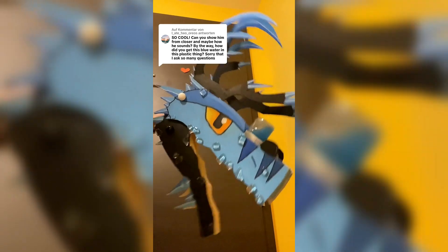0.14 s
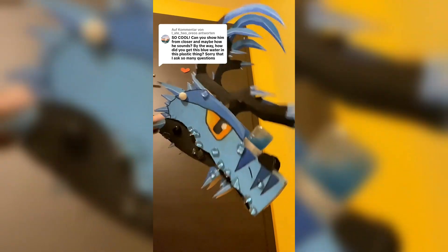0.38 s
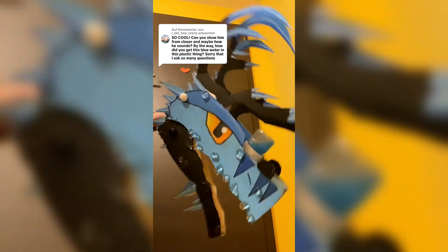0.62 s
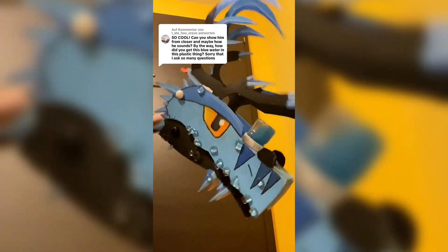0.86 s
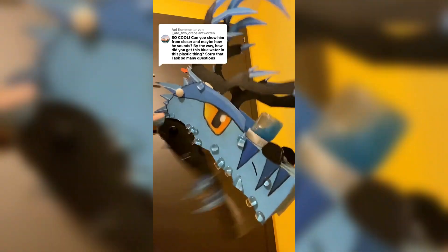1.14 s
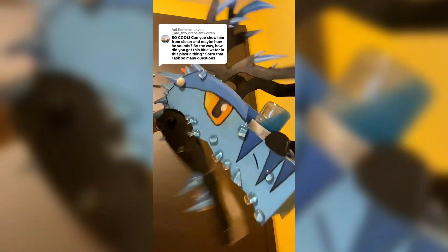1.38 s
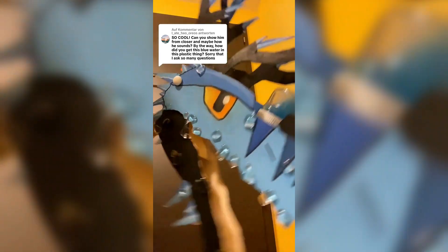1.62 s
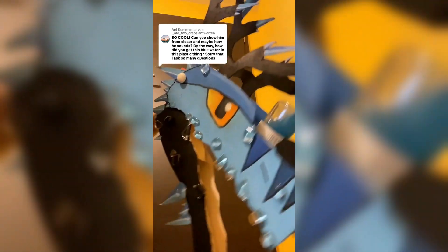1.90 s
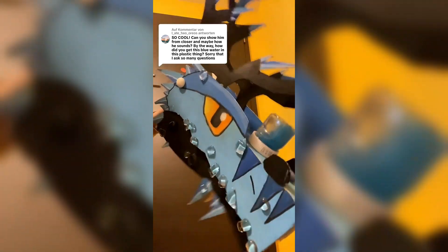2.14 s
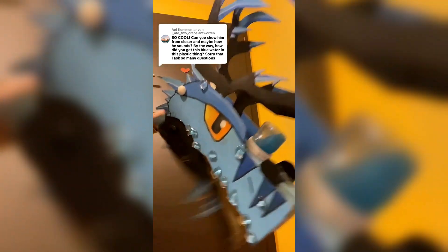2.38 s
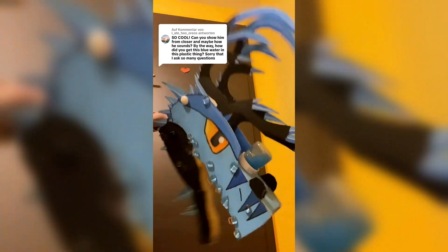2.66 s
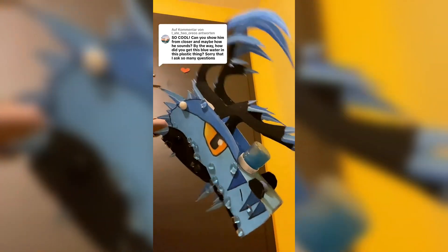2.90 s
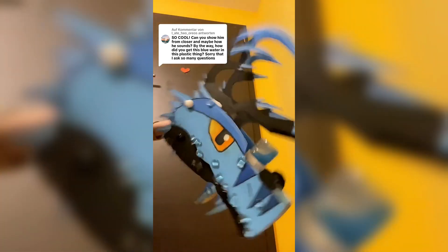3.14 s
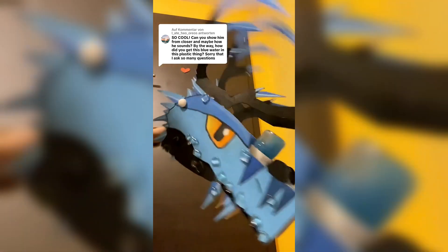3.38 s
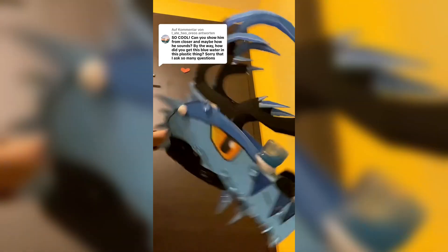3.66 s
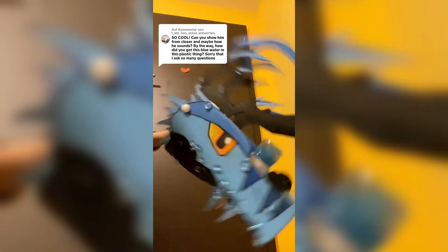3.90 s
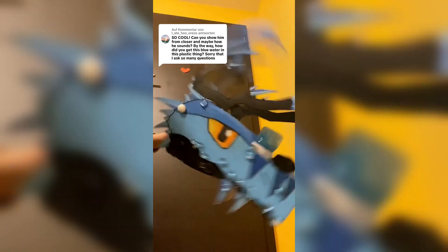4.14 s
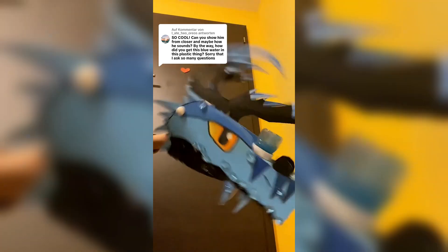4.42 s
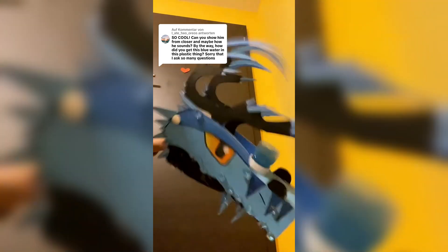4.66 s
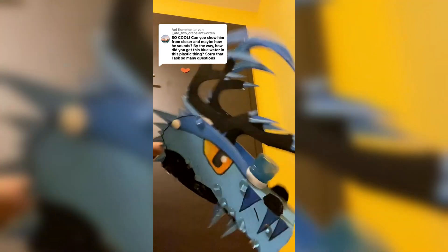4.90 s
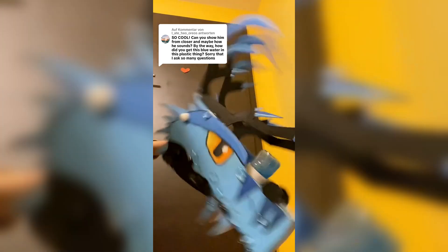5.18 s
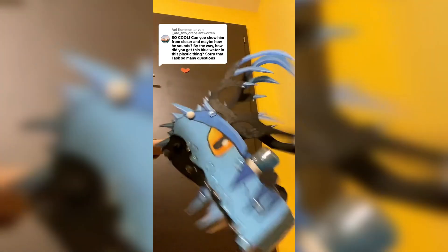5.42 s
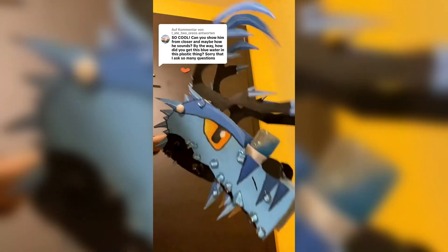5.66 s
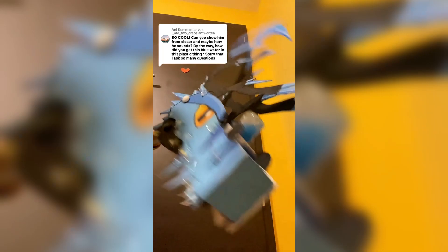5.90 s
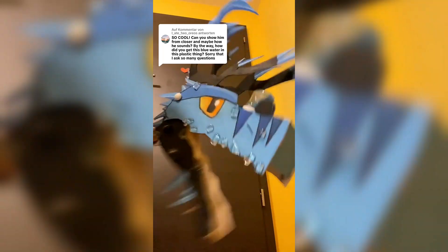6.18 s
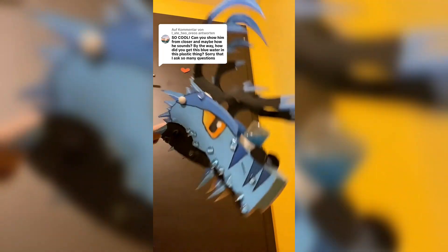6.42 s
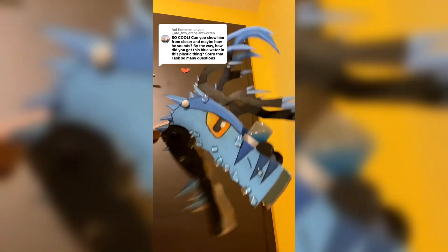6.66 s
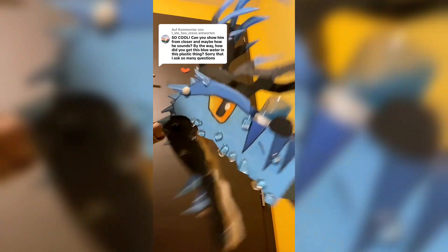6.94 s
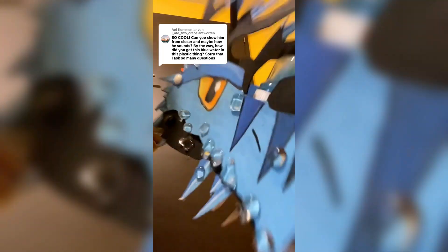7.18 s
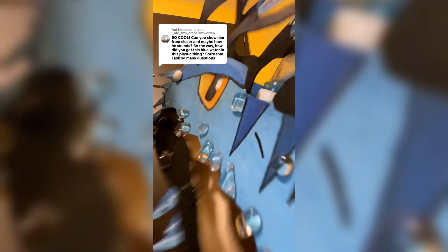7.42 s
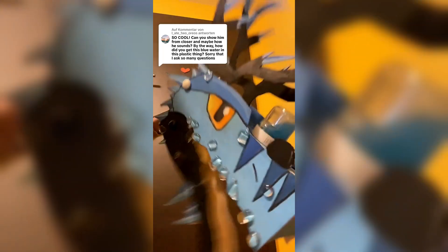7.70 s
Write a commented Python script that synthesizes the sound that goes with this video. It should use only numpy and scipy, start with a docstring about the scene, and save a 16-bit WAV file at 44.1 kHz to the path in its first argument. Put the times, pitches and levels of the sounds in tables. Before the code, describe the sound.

Sharp papery clacks and crisp crease ticks, sparse at first then crowded, ending in hard, slightly overloaded snaps in a small quiet room.

```python
"""A folded paper puppet snaps its jaws close to a phone in a small room.
Blows excite the damped modes of the hollow card jaws, creases snap in sprays of tiny slips, and
the head booms as a fading sine. Sheets rub with gritty noise that also drives the jaw modes.
Low noise swells as the flapping head puffs air at the microphone, over a faint room tone;
the loudest snaps overload it."""
import sys
import numpy as np
from scipy import signal
from scipy.fft import rfft, irfft, next_fast_len
from scipy.io import wavfile
from scipy.ndimage import uniform_filter1d

SR = 44100
rng = np.random.default_rng(int(sys.argv[2]) if len(sys.argv) > 2 else 0)


def decibels_to_gain(level_db):
    """Convert a level in decibels to a linear amplitude gain (20 dB per decade)."""
    exponent = np.asarray(level_db, float) / 20
    return 10 ** exponent


def generate_wav(sig):
    """Save sig (samples, or channels by samples) to the path in sys.argv[1] as 16-bit PCM at SR."""
    pcm = np.round(np.clip(np.atleast_2d(sig).T, -1, 1) * 32767).astype(np.int16)
    wavfile.write(sys.argv[1], SR, pcm)


N = 344421  # samples

# Modes of the hollow jaws, which blows and rubbing each weight and damp in their own way.
# Each row: frequency in Hz, nominal level in dB, nominal 60 dB decay time in seconds.
JAW_MODES = [(310, -13, .03), (405, -9, .035), (560, -10, .02), (750, -1, .024), (880, -4, .016),
             (1020, -1, .02), (1240, -1, .022), (1450, -5, .014), (1690, -7, .012), (2150, -10, .009),
             (2600, -11, .01), (3250, -19, .007)]


def colour(x, points):
    """Linear filtering: weights the spectrum by (Hz, dB) points joined along log frequency."""
    hz, db = np.transpose(points)
    size = next_fast_len(len(x))
    f = np.arange(size // 2 + 1) * SR / size + 1  # 1 Hz up, to keep the logarithm finite
    gain = decibels_to_gain(np.interp(np.log(f), np.log(hz), db))
    return irfft(rfft(x, size) * gain, size)[:len(x)]


def unit(x):
    """Normalises the mean power: scales to rms 1."""
    return x / np.sqrt(np.mean(x ** 2))


def loudest_rms(x):
    """Short-time power: the highest rms over any 3 ms."""
    return np.sqrt(uniform_filter1d(x ** 2, size=132).max())


def fade(t, t60):
    """Linear damping: exponential decay, 60 dB in t60 seconds."""
    return np.exp(-np.log(1000) * t / t60)


def add(track, s, sound):
    """Superposition: mixes a short sound into the track at time s in seconds."""
    i = int(s * SR)
    track[i:i + len(sound)] += sound[:len(track) - i]


def grit(shape, scatter_db):
    """Stick-slip noise: samples that differ widely in size, as a stream of tiny slips."""
    size_db = scatter_db * np.minimum(rng.exponential(size=shape), 6.0)
    return rng.standard_normal(shape) * decibels_to_gain(size_db)


def walk(rate):
    """Slow random modulation: a new level every 1 / rate seconds, joined by straight slopes."""
    k = int(SR / rate)
    held = np.repeat(rng.standard_normal(N // k + 1), k)
    return uniform_filter1d(held, k)[:N]


def ring(t, hz, db, t60, phase):
    """Modal superposition: the sum of exponentially fading sines."""
    waves = np.sin(2 * np.pi * hz[:, None] * t + phase[:, None])
    return (decibels_to_gain(db)[:, None] * fade(t, t60[:, None]) * waves).sum(axis=0)


def swells(full, held, db, rise_db_s, fall_db_s, rest_db):
    """Power sum of gestures that rise until the time full, hold and fall away over a resting level."""
    t = np.arange(0, N, 64)[:, None] / SR
    before = np.maximum(full - t, 0)
    after = np.maximum(t - full - held, 0)
    shape_db = db - rise_db_s * before - fall_db_s * after
    gain = np.sqrt(decibels_to_gain(rest_db) ** 2 + (decibels_to_gain(shape_db) ** 2).sum(axis=1))
    return np.interp(np.arange(N) / SR, t[:, 0], gain)


def knocks():
    """Impact excitation: a short press of many contacts rings the jaw modes, then loose card rattles."""
    # Jaws and flaps meeting. Each row: start in seconds, level in dB (2.5 above the loudest 3 ms rms),
    # pitch the ring gathers around in Hz, lift of the modes under 650 Hz in dB,
    # rattle in dB (before a common lift and random lumps).
    blow_rows = [(0.083, -42.5, 970, -2, -13), (0.14, -40.5, 1020, -8, -17), (0.215, -41, 1060, -4, -20),
                 (0.252, -34, 1120, 2, -5), (0.264, -27.5, 1690, -6, -18), (0.288, -2.5, 905, 3, -19),
                 (0.513, -37.5, 1050, -12, -27), (0.604, -25, 1120, -7, -25), (0.685, -41, 1050, 9, -15),
                 (0.726, -22.5, 1040, -1, -15), (0.771, -14, 960, 6.5, -15), (0.891, -35.5, 1190, -4, -9),
                 (0.937, -34, 1470, -6, -9), (0.992, -24, 1160, -16, -28), (1.166, -8.5, 845, 10.5, -12.5),
                 (1.239, -25.5, 1020, 2, -17), (1.343, -35, 1140, 1, -17), (1.46, -38, 490, 3, -8),
                 (1.514, -35, 1230, 0, -24), (1.711, -43, 1010, -6, -13.5), (1.9, -33, 1230, -2.5, -20),
                 (1.997, -39, 1250, -13, -20), (2.018, -19.5, 1560, -8, -15),
                 (2.045, -16.5, 965, -22, -13.5), (2.131, -43, 1070, -4, -17), (2.193, -35, 1030, -1, -30),
                 (2.215, -26.5, 1030, -10, -22.5), (2.37, -38, 1050, -4, -24), (2.397, -24, 860, -5, -21),
                 (2.457, -30, 1390, -13, -22), (2.479, -35.5, 870, 6, -10), (2.598, -29, 1280, -9, -21),
                 (2.609, -22.5, 1050, -10, -20), (2.718, -35, 1270, 3, -24), (2.742, -28, 1240, 5, -20),
                 (2.758, -14.5, 566, 3, -14.5), (2.783, -21, 410, 10, -17), (2.901, -17, 490, -4, -31),
                 (2.984, -31.5, 790, 0, -14), (3.133, -31, 1700, -12, -15), (3.158, -24, 1260, -4, -11),
                 (3.195, -21.5, 960, -4, -20), (3.234, -17, 1200, -8, -11), (3.253, -5.5, 1180, 3, -14),
                 (3.486, -25, 850, 4, -8), (3.584, -33, 870, -2, -17), (3.647, -28, 960, 3, 4),
                 (3.73, -29, 1270, 0, -8), (3.848, -30, 1040, 3, -13), (3.857, -31.5, 410, 7, -14),
                 (3.896, -42, 430, 11, -17), (3.923, -34, 1480, -3, -17), (3.973, -28.5, 1240, 4, -8),
                 (3.993, -25, 930, -2, -17), (4.03, -33, 960, 5, -14), (4.096, -18.5, 795, -10, -3),
                 (4.162, -28, 930, -6, -17), (4.2, -20, 860, 6, -15), (4.307, -31, 786, 1, -17),
                 (4.337, -23.5, 826, 6, -11), (4.358, -22.5, 1030, 1, -8), (4.508, -22, 810, 9.5, -8),
                 (4.544, -31, 700, -8, -26), (4.697, -18, 860, 3, -19), (4.725, -23, 930, 5, -8),
                 (4.89, -27.5, 450, -7, -19), (4.928, -22.5, 526, -6, -16.5), (5.123, -18.5, 1010, 2, -29),
                 (5.187, -21, 746, 6, -17), (5.356, -42, 490, -7, 0), (5.472, -31.5, 400, -6, -12),
                 (5.492, -19, 590, 6.5, -11), (5.535, -36, 1140, 8, -15), (5.592, -39, 467, 1, -14),
                 (5.618, -34, 950, -1, -17), (5.635, -33.5, 820, 8, -17), (5.689, -34, 830, -6, -17),
                 (5.744, -34, 980, -1, -9), (5.825, -32.5, 1220, -10, -26), (5.946, -34.5, 1000, -5, -15),
                 (5.977, -28, 396, 3, -10), (6.255, -20, 1020, -5, -11), (6.264, -1, 970, -22, -17),
                 (6.384, -36, 720, -7, -21), (6.407, -30.5, 960, -3, -12), (6.488, -41, 1020, -15, -19),
                 (6.536, -30, 1380, -9, -18.5), (6.672, -30.5, 1160, 2, -21),
                 (6.708, -1.5, 1260, -18, -20.5), (6.824, -32, 1700, -11, -27), (6.908, -42, 1000, -7, -31),
                 (6.978, -37.5, 1090, 3, -15), (7.055, -31, 400, 9, -12), (7.079, -15, 1110, 16, -28),
                 (7.11, -2, 1220, 4.5, -19), (7.197, -28.5, 750, -2, -20), (7.31, -38.5, 1170, -4, -17),
                 (7.367, -34, 550, 5, -25), (7.479, -1, 760, -1, -18), (7.597, -30.5, 740, 1, -12)]
    contact_ms, contact_law = 6.4, 0.33  # at 1 kHz; a lower patch is softer and is pressed longer
    out, t = np.zeros(N), np.arange(6000) / SR
    ring_t = t[:2000]
    hz, db, t60 = np.transpose(JAW_MODES)
    count = len(blow_rows)
    chance, slips = rng.standard_normal((count, 3, len(hz))), grit((count, len(t)), 2.3)
    lumps = np.repeat(rng.standard_normal((count, 15)), 400, axis=1)
    lumps = uniform_filter1d(lumps, size=200, axis=1)
    thin = signal.butter(2, 220, "high", fs=SR, output="sos")  # thin card radiates no bass
    for (s, level_db, pitch, low_db, rattle_db), c, slip, lump in zip(blow_rows, chance, slips, lumps):
        # a light tap wakes only the patch it lands on, a hard blow the whole jaw
        db_per_octave = -6.0 + 0.64 * level_db
        near_db = db_per_octave * np.abs(np.log2(hz / pitch)) + low_db * (hz < 650)
        # the jaws bend as they are worked, so the modes shift from blow to blow
        body = ring(ring_t, hz * (1 + .03 * c[0]), db + near_db + 1.5 * c[1], t60, 2 * c[2])
        # loose card is damped far more than the struck jaw
        loose = ring(ring_t, hz * (1 + .04 * c[1]), db + .4 * near_db, .3 * t60, .6 * c[2])
        ms = contact_ms * (1000 / pitch) ** contact_law
        press = np.exp(-(t * 1000 / ms) ** 3)
        closing = 1 - np.exp(-t / 0.00056)
        rattle_gain = decibels_to_gain(rattle_db + 6.0 + 3.6 * lump)
        rattle = slip * rattle_gain * fade(t, 0.12) * (1 - t / t[-1])
        struck = signal.fftconvolve(body, slip * closing * press)
        rattling = signal.fftconvolve(loose, rattle)
        blow = signal.sosfilt(thin, struck + rattling)
        add(out, s, decibels_to_gain(level_db - 2.5) * blow / loudest_rms(blow))
    return out


def ticks():
    """Stick-slip release: a crease creeps, snaps in a spray of slips and stops; the sheet rustles on."""
    # Edges and creases snapping. Each row: time of the snap in seconds (it follows within 1 ms, after a creep),
    # level in dB (10 above the loudest 3 ms rms), brightness in dB (nominal tilt from 3 kHz to
    # about 12 kHz), rustle in dB (before random lumps).
    snap_rows = [(0.038, -34, 0, -23), (0.0811, -22, 0, -18), (0.141, -29, -15, -15),
                 (0.1988, -28.5, -34, -18), (0.2379, -35, -2, -13), (0.2648, -11.5, -2, -5),
                 (0.2839, -8, -5, 6), (0.3974, -27, 9, -11), (0.689, -34, -5, 2), (0.7072, -14, -7.5, -7),
                 (0.741, -20, 0, -2), (0.7556, -9.5, -3.5, -11.5), (0.781, -15.5, 4, -3),
                 (0.8248, -13.5, -10, -17), (0.9344, -27.5, -1, -1), (1.1133, -18.5, -12, -13),
                 (1.1297, -22, 1, -15), (1.145, -17.5, -5, -17), (1.168, -6, -9, -2.5),
                 (1.2385, -15.5, -8, -26), (1.289, -21, 5, -22), (1.3194, -27, 2, -9),
                 (1.5278, -12, -6, -14), (1.557, -15.5, 15, -11), (1.599, -29, 6, -3),
                 (1.628, -31, -11, -11), (1.713, -20, -15, -15), (1.7704, -31.5, -20, -9),
                 (1.953, -39, -1, -13), (1.9741, -24.5, -5, -19), (2.0102, -3.5, 4, -7),
                 (2.0956, -33, -15, -6), (2.1302, -14, -6, -19), (2.19, -26, -4, 1), (2.2136, -24, -21, 2),
                 (2.352, -28, 2, -13), (2.3904, -16, -3, 12), (2.424, -14.5, -5, -11),
                 (2.4588, -20, -9, -20), (2.5521, -22, 7, -16), (2.591, -14.5, -4, -13),
                 (2.609, -17.5, -19, 3), (2.7376, -20, -10, -20), (2.7686, -3, 3, -12),
                 (2.9037, -8.5, -6.5, -15), (2.9841, -18.5, 1, -14), (3.1187, -34, -14, -2),
                 (3.134, -3.5, 8, -15), (3.1577, -13, -10, -4), (3.1752, -9, -2, -1), (3.2281, -5, -16, 7),
                 (3.2519, 0.5, -9, -16), (3.298, -8, 5, -2), (3.484, -11, -17.5, -14),
                 (3.5742, -10.5, 5.5, -18), (3.6546, -33.5, -4, -7), (3.6795, -30, 7, -11),
                 (3.7248, -25, 0, -2), (3.74, -19, -1, -4), (3.826, -22.5, -13, -3), (3.8593, -13, 1.5, -8),
                 (3.922, -24, -4, -5), (3.9731, -25, -8, -7), (3.9908, -16, -6, -7), (4.0233, -23, -3, -15),
                 (4.054, -28.5, 3, -5), (4.1035, -8.5, -17.5, -24), (4.16, -20, -22, -14),
                 (4.1972, -20, -15, -13), (4.211, -16.5, -10, -31), (4.311, -18, 2, -13),
                 (4.351, -14, 0, -8), (4.3553, -11.5, -6, -11), (4.5038, -10, -14.5, -3),
                 (4.5498, -14.5, 0.5, 14), (4.6406, -28.5, -8, -16), (4.695, -10, -7, -14),
                 (4.7262, -13.5, -4.5, -5), (4.7705, -24.5, 0, -11), (4.89, -16, -1.5, -13),
                 (4.9271, -21, -18, -9), (4.9434, -15.5, -4, 10.5), (5.0325, -25.5, -11, -21),
                 (5.1222, -18, -5, -3), (5.1857, -22, -12, -1), (5.2054, -17, -2, 3),
                 (5.387, -26.5, 4.5, 10), (5.4834, -23, 3, -9), (5.4862, -14, -9.5, -10),
                 (5.591, -25, -5, -8), (5.6194, -16.5, 11, 4), (5.69, -12, -1, -9), (5.7275, -14, 10, 5),
                 (5.7652, -11.5, -1, -3), (5.81, -21, 8, -3), (5.826, -6, 18.5, -11), (5.9728, -15.5, 8, 4),
                 (6.169, -30.5, -1, -12.5), (6.226, -32, -7, -11), (6.26, -6.5, 4, -20),
                 (6.321, -6.5, 10, -19), (6.3843, -12, 6, 5), (6.436, -17.5, 13, -16), (6.633, -33, 18, -4),
                 (6.6517, -23.5, -6, -16), (6.678, -24, 4, -6), (6.69, -20, 9, -1), (6.7077, -16.5, 1, -11),
                 (6.7525, -9, 5, -11), (6.827, -10, 7, -14), (6.8639, -17, 11, -17),
                 (7.054, -19.5, -4.5, -18), (7.089, -15, 0, -13), (7.1083, -7, -2, -7),
                 (7.146, -6.5, 6, -10), (7.2, -7.5, 1.5, -7), (7.253, -9, 18, -25), (7.286, -27.5, -3, -1),
                 (7.4076, -32, -12, -13), (7.422, -35, 4, 6), (7.4376, -20, 1, -3),
                 (7.4688, -0.5, 2.5, -8.5), (7.522, -23, -24, -9), (7.535, -7, 4, -37),
                 (7.5612, -8, -3, -21), (7.5972, -20, -3, -21), (7.6245, -8, 19, -39)]
    # nominal length of a 0 dB snap in ms, ms gained per dB (weaker ones are shorter), log scatter
    snap_ms, snap_ms_per_db, snap_scatter = 7.9, 0.3, 0.36
    out, t = np.zeros(N), np.arange(4096) / SR - .006  # the creep fills the time before zero
    count = len(snap_rows)
    slips, bumps = grit((count, 4096), 4.2), rng.standard_normal((count, 15))
    lumps = np.repeat(rng.standard_normal((count, 16)), 256, axis=1)
    at = np.geomspace(1500, 17000, 14)  # Hz
    creep, late = np.exp(np.minimum(t, 0) / 0.0013), np.maximum(t, 0)
    for (s, level_db, bright_db, after_db), slip, bump, lump in zip(snap_rows, slips, bumps, lumps):
        ms = max(snap_ms + snap_ms_per_db * level_db, 1) * np.exp(snap_scatter * bump[-1])
        burst = np.exp(-(late * 1000 / ms) ** 2)
        crack = 0.33 * fade(late, 0.00055)
        rustle = decibels_to_gain(after_db + 3.5 * lump) * fade(late, 0.27) * (1 - late / late[-1])
        spray = slip * creep * (burst + crack + rustle)
        tilt_db = np.interp(np.log(at), np.log([1500, 3000, 6800, 12500, 17000]),
                            [-2.5, 0, bright_db / 2 - 1.5, bright_db + 2.5, bright_db - 4.0])
        uneven_db = 2.4 * bump[:-1]  # each snap has its own uneven colour
        snap = colour(spray, [(600, -26.5), *zip(at, tilt_db + uneven_db)])
        add(out, max(s - .0052, 0), decibels_to_gain(level_db - 10) * snap / loudest_rms(snap))
    return out


def thumps():
    """Damped resonance: the hollow head booms briefly when the hand jerks it."""
    # The whole head jolting. Each row: start in seconds, level in dB (before a common lift
    # and the onset and decay), pitch in Hz.
    jolts = [(0.038, -42, 267), (0.213, -45, 273), (0.254, -41, 193), (0.287, -37, 290), (0.605, -43, 285),
             (0.685, -36, 267), (0.774, -17.5, 197), (0.823, -31, 193), (1.169, -16, 189),
             (1.321, -35, 283), (1.52, -35, 156), (1.906, -41, 183), (2.013, -35, 297), (2.156, -38, 168),
             (2.399, -43, 143), (2.76, -27, 182), (2.783, -18, 197), (2.902, -34, 213), (3.161, -40, 280),
             (3.255, -37, 234), (3.497, -36, 201), (3.731, -34.5, 210), (3.848, -36.5, 232),
             (3.919, -37, 154), (3.998, -28, 201), (4.106, -30, 132), (4.211, -26.5, 209),
             (4.355, -34, 216), (4.514, -33, 199), (4.701, -36, 237), (4.896, -36, 232),
             (5.124, -29.5, 210), (5.189, -34, 235), (5.394, -42.5, 167), (5.495, -32, 187),
             (6.261, -17, 295.4), (6.411, -40, 181), (6.699, -26, 133), (6.709, -24.5, 202),
             (7.073, -26, 296), (7.112, -28.5, 207), (7.22, -41, 132), (7.485, -16, 193), (7.538, -40, 175),
             (7.568, -29, 131)]
    out, t = np.zeros(N), np.arange(6000) / SR
    for s, level_db, pitch_hz in jolts:
        boom = np.sin(2 * np.pi * pitch_hz * t) * fade(t, 0.073) * (1 - np.exp(-t / 0.0039))
        add(out, s, decibels_to_gain(level_db + 2.5) * boom)
    return out


def rub():
    """Friction excitation: gritty slips hiss directly, and grit drives the jaw modes."""
    # Sheets sliding over each other. Each row: time full strength is reached in seconds,
    # time held in seconds, hiss in dB, share that rings the hollow jaws in dB relative to the hiss.
    slide_rows = [(0.018, 0.052, -45, -17), (.22, 0.044, -49.5, -8), (.31, 0.043, -40, -1),
                  (0.389, 0.054, -39, -5), (.5, 0.1, -48, -7.5), (.7, .04, -49, -8), (.79, 0.028, -50, 7),
                  (.86, 0.068, -42, -14), (1.13, .06, -34, -9.5), (1.24, 0.14, -38, -8.5),
                  (1.0, 0.13, -55.5, -2), (1.5, 0.026, -47, -1.5), (1.68, 0.095, -52, -5),
                  (2.002, 0.048, -29, -25), (2.1, 0.13, -37, -11), (2.382, 0.036, -32.5, -10.5),
                  (2.48, .15, -38, -6.5), (2.771, 0.032, -26.5, -4), (2.87, 0.092, -48, -17),
                  (2.999, 0.018, -45.5, -9), (3.11, .02, -48, -6), (3.15, 0.043, -38.5, -1),
                  (3.23, .03, -26.5, -6.5), (3.28, 0.065, -36.5, -3), (3.51, 0.02, -36, -4),
                  (3.6, 0.088, -51.5, 1.5), (3.859, 0.07, -41.5, -1.5), (3.99, 0.042, -44, 5),
                  (4.102, 0.023, -38, 2), (4.16, 0.083, -43, 0), (4.36, 0.04, -43.5, -2),
                  (4.46, .03, -56, -15), (4.63, 0.022, -50, -6.5), (4.74, 0.12, -48.5, -8.5),
                  (4.95, 0.021, -49, 5), (5.07, 0.037, -48, -10), (5.22, 0.14, -48.5, -15),
                  (5.39, 0.037, -46.5, -4.5), (5.46, 0.16, -44.5, -12), (5.66, 0.13, -45.5, -1.5),
                  (5.83, 0.13, -43, -3.5), (5.98, 0.087, -38, -12.5), (6.25, 0.015, -32, -22),
                  (6.36, .14, -45.5, -12), (6.55, 0.041, -53, 1), (6.72, 0.1, -40.5, -12),
                  (6.83, 0.083, -38.5, -14), (6.97, 0.055, -50.5, -1), (7.09, .02, -29, -15),
                  (7.16, 0.078, -50, 9), (7.27, .08, -57, 3), (7.462, 0.027, -36.5, -5.5),
                  (7.62, 0.084, -47, -5)]
    # Colour of the hiss. Each row: frequency in Hz, relative spectral level in dB.
    hiss_colour = [(940, -5), (1600, 1.5), (2240, -2), (2470, 0.5), (4710, -5), (6160, -1), (7550, -6.5),
                   (12100, -2.5), (16000, 0)]
    rise_db_s, fall_db_s = 502.5, 205  # dB per second
    still_db, still_hollow_db = -59, -71.5  # the paper is never quite still
    full, held, hiss_db, share_db = np.transpose(slide_rows)
    slips = grit(N, 1.3) * decibels_to_gain(3.14 * walk(70) + 1.9 * walk(400))
    hiss = unit(colour(slips, hiss_colour))
    t = np.arange(int(.06 * SR)) / SR
    hz, db, t60 = np.transpose(JAW_MODES)
    body = ring(t, hz, 3.0 * db, 0.7 * t60, 0 * hz)
    drive = grit(N, 3.5) * decibels_to_gain(4.5 * walk(50))
    hollow = unit(signal.fftconvolve(drive, body)[:N])
    hiss_gain = swells(full, held, hiss_db, rise_db_s, fall_db_s, still_db)
    hollow_gain = swells(full, held, hiss_db + share_db, rise_db_s, fall_db_s, still_hollow_db)
    return hiss_gain * hiss + hollow_gain * hollow


def puffs():
    """Flow noise: moving air rumbles on the microphone as low coloured noise."""
    # Air pushed by the flapping head. Each row: time the puff reaches its peak in seconds, level in dB.
    puff_rows = [(0.06, -50), (0.3, -37.5), (0.45, -50), (0.7, -45), (0.78, -32), (1.02, -55), (1.18, -32),
                 (1.54, -50), (1.93, -54), (2.03, -39), (2.42, -40), (2.55, -58), (2.63, -61), (2.8, -37.5),
                 (3.02, -52), (3.27, -30.5), (3.52, -51), (3.61, -54), (3.76, -41.5), (3.87, -42),
                 (4.04, -46), (4.12, -35), (4.38, -42), (4.45, -41), (4.53, -43), (4.65, -56),
                 (4.74, -38.5), (4.95, -42), (5.08, -55), (5.21, -39), (5.51, -41), (5.76, -61), (6.0, -41),
                 (6.28, -35), (6.42, -51), (6.58, -55), (6.72, -43), (6.86, -62), (7.15, -31.5),
                 (7.23, -48), (7.34, -49), (7.51, -32.5), (7.58, -35)]
    # Colour of the rumble. Each row: frequency in Hz, relative spectral level in dB.
    air_colour = [(20, -23), (40, -11.5), (70, 1), (110, 1), (170, -4), (300, -37)]
    rise_db_s, fall_db_s = 403.5, 217.5  # dB per second
    held_s, draught_db = 0.0098, -59
    peak_s, db = np.transpose(puff_rows)
    air = unit(colour(rng.standard_normal(N), air_colour) * decibels_to_gain(1.2 * walk(17)))
    return swells(peak_s, held_s, db, rise_db_s, fall_db_s, draught_db) * air


def room(x):
    """Diffuse reverberation: convolution with the decaying noise tail of a small furnished room."""
    t = np.arange(int(.5 * SR)) / SR
    low, high = rng.standard_normal((2, len(t))) * (1 - np.exp(-t / 0.003))
    low_tail = colour(low * fade(t, 0.35), [(100, 3.5), (400, 3.0), (1800, -1), (4000, -46.5)])
    high_tail = colour(high * fade(t, 0.4), [(1000, -43), (2500, 0.5), (16000, -7)])
    tail = low_tail + decibels_to_gain(-2.5) * high_tail
    return signal.fftconvolve(x, tail / np.sqrt(np.sum(tail ** 2)))[:N]


def room_tone():
    """Stationary background noise: a steady, faint coloured noise at -65 dB rms."""
    # Colour of the tone. Each row: frequency in Hz, relative spectral level in dB.
    tone_colour = [(100, -11), (200, -2), (500, -1), (1500, -12.5), (5000, -20)]
    return decibels_to_gain(-65) * unit(colour(rng.standard_normal(N), tone_colour))


def scene():
    """Superposition of direct and diffuse sound: the puppet near and dry, a little room behind it."""
    hits = knocks() + ticks() + thumps()
    tone = room_tone()
    reverberant = decibels_to_gain(-17.0) * room(hits)
    return (hits + reverberant + rub() + puffs() + tone)[None]


def low_pass(x):
    """Removes everything above the highest recorded frequency."""
    return signal.sosfilt(signal.butter(12, 17020, fs=SR, output="sos"), x)


def record(dry):
    """Band limiting and overload: the phone cuts the top and flattens the loudest peaks."""
    top_cut = signal.ellip(8, .2, 60, 15800, fs=SR, output="sos")  # ripple dB, rejection dB, edge Hz
    mix = np.clip(signal.sosfilt(top_cut, dry), -1, 1)
    return low_pass(mix)


dry = scene()
out = record(dry)
generate_wav(out)
```